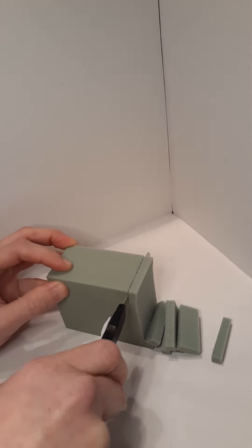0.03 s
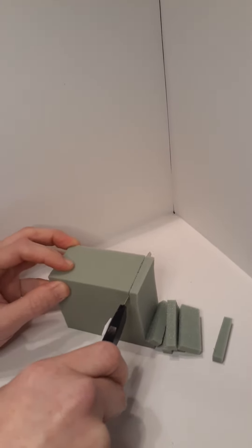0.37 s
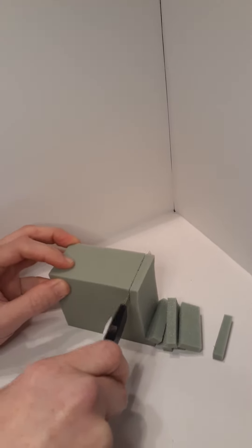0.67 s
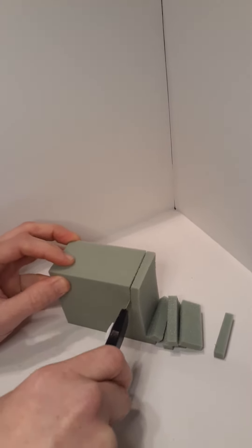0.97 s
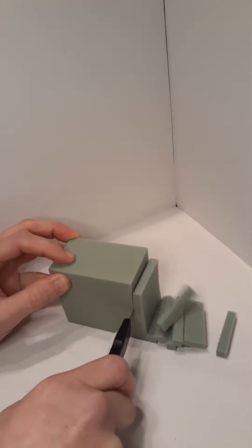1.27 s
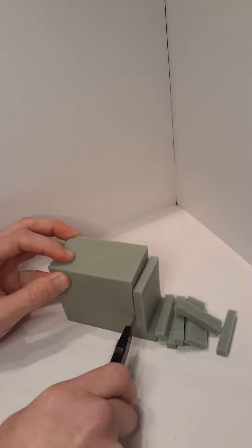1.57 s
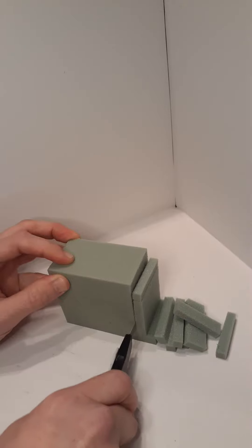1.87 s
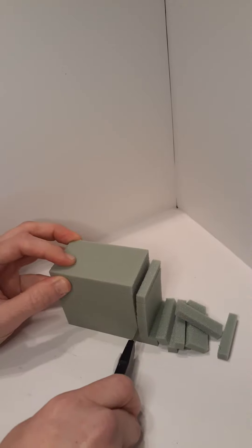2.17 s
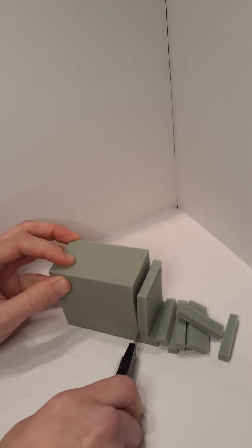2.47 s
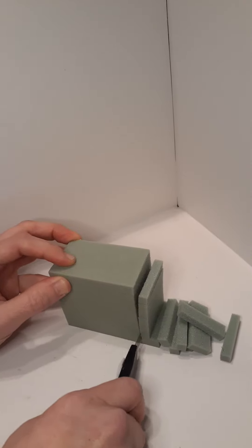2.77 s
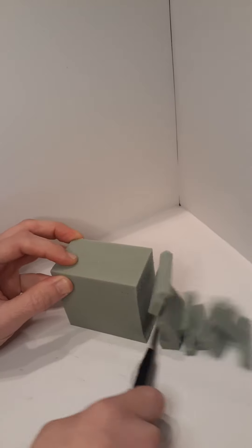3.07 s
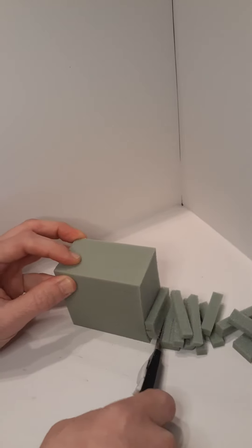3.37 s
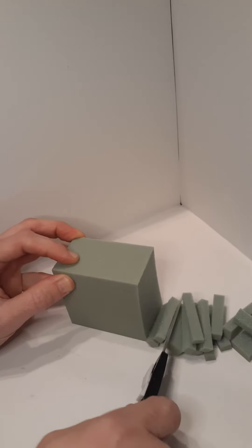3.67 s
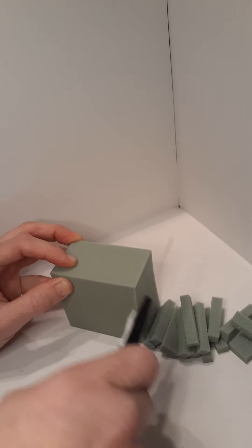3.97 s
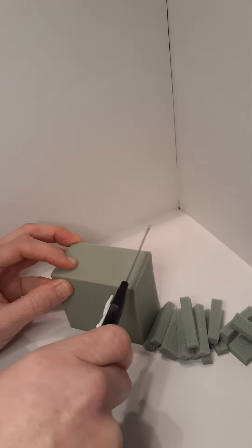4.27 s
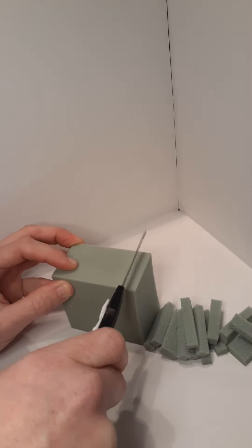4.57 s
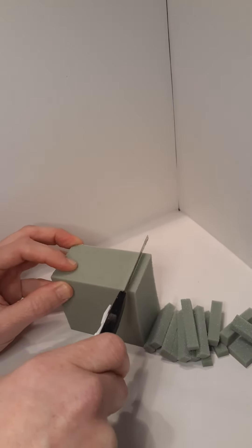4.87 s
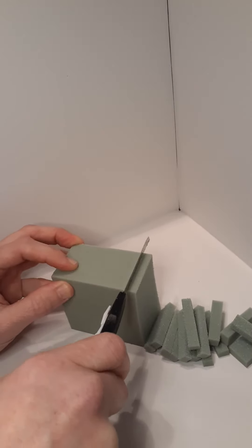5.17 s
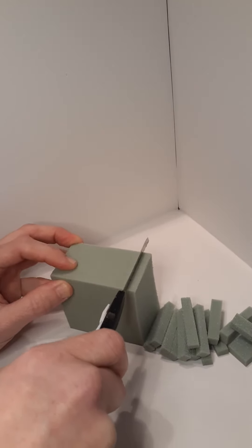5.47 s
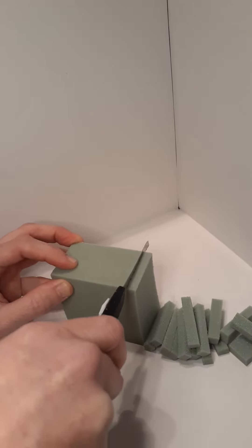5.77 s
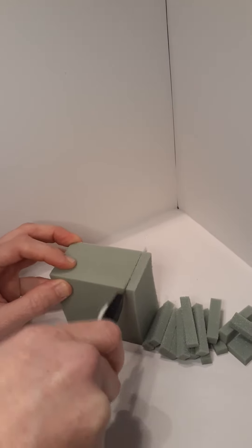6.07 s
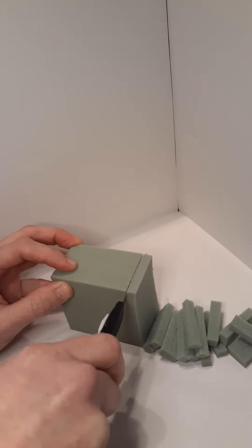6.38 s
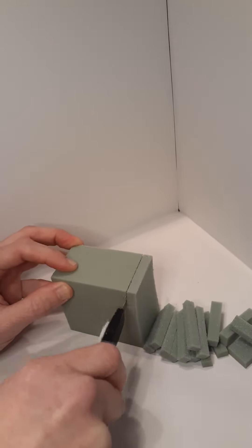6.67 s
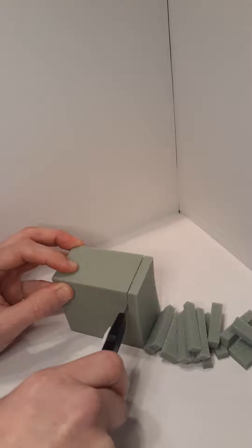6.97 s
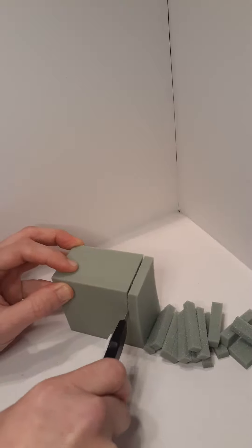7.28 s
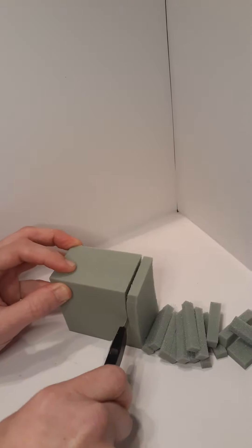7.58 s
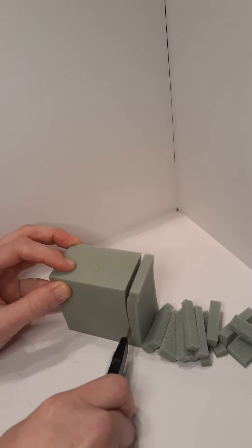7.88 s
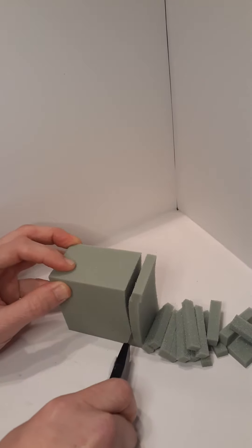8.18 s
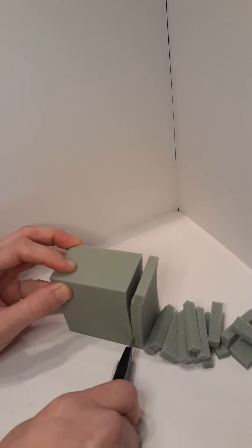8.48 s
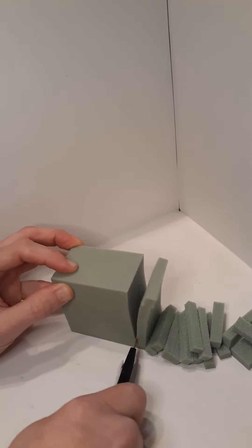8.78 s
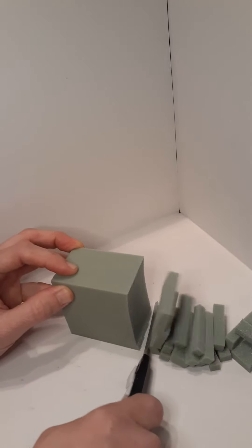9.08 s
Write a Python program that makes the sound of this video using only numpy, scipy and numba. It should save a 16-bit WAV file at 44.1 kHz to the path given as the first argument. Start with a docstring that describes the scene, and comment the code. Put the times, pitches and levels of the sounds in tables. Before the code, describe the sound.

Close, brittle crunching and crackling of a blade cutting two slices of dry floral foam, which fall with light, dry ticks.

```python
"""A table in the corner of a small bare room, a phone's two microphones close to a block of dry floral foam.
A knife is pushed down through the block twice. Brittle cells pop in slips: separate crackles when the
blade creeps, a dense crunch with a dull knock when it lunges. The crunch rings the block and the slice;
each slice finally snaps off and topples on to the pile of earlier ones. Hands rumble softly on the
table, over low room air and a faint mains hum."""
import sys
import numpy as np
from scipy import signal
from scipy.fft import rfft, irfft, next_fast_len
from scipy.io import wavfile
from scipy.ndimage import uniform_filter1d
from numba import njit

SR = 44100
rng = np.random.default_rng(int(sys.argv[2]) if len(sys.argv) > 2 else 0)


def write(x):
    x = np.atleast_2d(x).T
    wavfile.write(sys.argv[1], SR, np.round(np.clip(x, -1, 1) * 32767).astype(np.int16))


N = 407484
T = np.arange(N) / SR
CLOCK = T[::20]  # the hand moves slowly, so its motion needs few time steps

# the blade strains the foam, then lunges through it:
# (start [s], length [s], straining beforehand [s], level [dB], knock [dB])
LUNGES = [(0, 0.034, 0.011, -16, -18.5), (.403, .018, .05, -19, -45), (0.669, 0.052, .11, -16, -29.5),
          (0.969, .105, .122, -16.5, -18.5), (1.291, 0.016, 0.044, -23, -51),
          (1.405, .077, .004, -16.5, -30.5), (1.83, .056, .045, -18, -27.5),
          (2.032, 0.018, 0.067, -19.5, -50.5), (2.135, .012, .005, -14.5, -20.5),
          (5.227, .024, .005, -19, -47), (5.342, 0.028, .01, -20, -45), (6.03, 0.077, .005, -15.5, -38.5),
          (6.656, .043, 0.051, -17.5, -21), (7.148, 0.063, .018, -17, -19), (7.412, 0.053, .027, -16, -27),
          (7.64, .068, 0.054, -15.5, -28), (7.818, .06, .035, -17, -29.5), (7.978, 0.054, .096, -18, -28.5)]
GIVE_SHARE = .58  # the foam gives way this far through each lunge
# a slice lands flat and bounces: (time [s], tick [dB], hollow body [dB], knock [dB])
LANDINGS = [(2.9665, -16, -32, -38.5), (3.0207, -13.5, -24, -29), (3.0402, -12, -29, -24),
            (3.1697, -38, -47.5, -54), (8.7898, -15, -42.5, -31.5), (8.877, -7, -36.5, -27),
            (8.894, -10.5, -32.5, -20.5)]


def undb(db):
    """Decibels to gain."""
    return 10 ** (np.asarray(db) / 20)


def unit(x):
    """Scale to rms 1."""
    return x / np.sqrt(np.mean(x ** 2) + 1e-18)


def contour(points, size):
    """A (frequency [Hz], level [dB]) outline on the bins of a transform."""
    hz, db = np.transpose(points)
    return np.interp(np.log(np.fft.rfftfreq(size, 1 / SR) + 1), np.log(hz), db)


def colour(x, points, size=4096):
    """Minimum-phase filter with the given outline; white noise keeps its power."""
    cepstrum = irfft(np.log(undb(contour(points, size))))
    cepstrum[1:size // 2] *= 2
    cepstrum[size // 2 + 1:] = 0
    impulse = unit(irfft(np.exp(rfft(cepstrum)))) / np.sqrt(size)
    return signal.oaconvolve(x, impulse[None])[:, :N]


@njit
def bandpass(x, hz, width_hz):
    """State-variable band-pass with a moving centre."""
    out, band, low = np.empty(len(x)), 0., 0.
    for i in range(len(x)):
        step, damping = np.tan(np.pi * hz[i] / SR), width_hz / hz[i]
        swing = (band + step * (x[i] + 1e-18 - low)) / (1 + step * (step + damping))
        band, low = 2 * swing - band, low + 2 * step * swing
        out[i] = damping * swing
    return out


def ring(x, hz, width_hz):
    """A steep-sided resonance; white noise keeps its power."""
    hz, width_hz = hz * np.ones(N), float(width_hz)
    rung = np.array([bandpass(bandpass(side, hz, width_hz), hz, width_hz) for side in x])
    return rung * np.sqrt(2 * SR / np.pi / width_hz)


def pair(three, likeness):
    """Left and right microphone from one shared signal and one of their own each."""
    return np.sqrt(likeness) * three[0] + np.sqrt(1 - likeness) * three[1:]


def noise(likeness):
    """White noise at both microphones."""
    return pair(rng.standard_normal((3, N)), likeness)


def room_tone(air_db=-64.5, waver_db=-2.5, hum_hz=120, hum_db=-73):
    """Low room air that wavers slowly, and a faint mains hum."""
    # spectrum of the room air: (frequency [Hz], level [dB])
    air_colour = [(30, -10.5), (55, -2.5), (100, -7.5), (125, 0), (160, -10), (350, -7), (440, -9),
                  (650, -20), (1000, -31), (2500, -43.5), (7000, -50), (14000, -48)]
    waver = np.interp(T, np.linspace(0, T[-1], num=60), rng.standard_normal(size=60))
    air = unit(colour(noise(0.62), air_colour)) * undb(air_db + waver_db * waver)
    return air + undb(hum_db) * np.sin(2 * np.pi * hum_hz * T)


def stroke(start, end, rise_db=0, attack_s=.005, release_s=.006):
    """Envelope of one movement: attack, a hold that may grow or sag, release."""
    along = np.clip((CLOCK - start) / max(end - start, 1e-3), 0, 1)
    attack = np.clip((CLOCK - start) / attack_s, 0, 1)
    release = np.exp(-np.maximum(CLOCK - end, 0) / release_s)
    return attack * release * undb(rise_db * (along - .5))


def hand(light_slips_hz=62.3, firm_slips_hz=53.86, firm_db=-23, lunge_slips_hz=998.5,
         strain_db=-4, strain_db_per_s=-135, peak_db=1, arch_db=1.3,
         withdraw_db=-57.5, withdraw_slips_hz=1097):
    """How hard the foam is pushed or rubbed, and its slips a second, which quicken with the push."""
    # slow crackle of the creeping blade, or faint rustle of a fallen slice rubbing on the pile:
    # (start [s], end [s], level [dB])
    crackles = [(0.034, 0.072, -29), (0.095, 0.148, -34), (0.229, 0.361, -50), (.724, 0.751, -27),
                (1.108, 1.18, -35), (1.317, 1.357, -38.5), (1.482, 1.511, -23), (1.571, 1.636, -29),
                (2.068, 2.12, -21), (2.264, 2.504, -22), (2.511, 2.627, -42), (2.636, 2.76, -51.5),
                (2.838, 2.906, -47.5), (3.147, 3.223, -43), (4.773, 4.891, -54), (4.894, 4.933, -38.5),
                (4.931, 5.012, -29), (5.061, 5.152, -30), (5.15, 5.227, -38.5), (5.26, 5.317, -31),
                (5.381, 5.441, -31), (5.446, 5.702, -23.5), (5.7, 5.927, -29), (5.931, 6.014, -32),
                (6.173, 6.268, -29), (6.323, 6.418, -32.5), (6.435, 6.542, -29.5), (6.785, 6.884, -32),
                (6.913, 6.974, -32), (6.974, 7.03, -23.5), (7.29, 7.343, -32), (8.139, 8.352, -23.5),
                (8.523, 8.742, -57), (9.059, 9.118, -50), (9.18, 9.241, -57)]
    slow, lunge, lunging = 0, 0, 0
    for start, end, db in crackles:
        slow = np.hypot(slow, undb(db) * stroke(start, end, rise_db=-1.5))
    for start, length, strain_s, db, _ in LUNGES:
        # straining grows towards its lunge, and is quieter the longer it takes
        strain = stroke(start - strain_s, start, rise_db=4)
        slow = np.hypot(slow, undb(db + strain_db + strain_db_per_s * strain_s) * strain)
        # a lunge peaks where the foam gives and falls off towards both ends
        move = stroke(start, start + length, attack_s=.002, release_s=.007)
        from_give = np.clip(2 * ((CLOCK - start) / length - GIVE_SHARE), -1, 1)
        lunge += undb(db + peak_db - arch_db * from_give ** 2) * move
        lunging += move
    # between the cuts the flat of the blade is drawn back along the cut face
    withdraw = stroke(start=3.36, end=3.76, rise_db=-6, attack_s=.14, release_s=.007)
    push = np.hypot(slow, lunge) + undb(withdraw_db) * withdraw
    slow_rate = light_slips_hz + firm_slips_hz * slow / undb(firm_db)
    rate = slow_rate + lunge_slips_hz * lunging + withdraw_slips_hz * withdraw
    return np.interp(T, CLOCK, push), np.interp(T, CLOCK, rate)


def avalanche(power, decay_ms, rise_ms=0.61):
    """Each slip sets off a run of breaking cells that dies away; returns their power."""
    ms = T[:SR // 50] * 1000
    shape = np.exp(-ms / decay_ms) * (1 - np.exp(-ms / rise_ms))
    return np.maximum(signal.oaconvolve(power, shape / shape.sum())[:N], 0)


def bursts(times, db, decay_ms):
    """Envelope of single avalanches, each with the energy of 3 ms at its level."""
    power = np.zeros(N)
    np.add.at(power, (times * SR).astype(int), undb(db) ** 2 * .003 * SR)
    return np.sqrt(avalanche(power, decay_ms))


def stick_slip(drag=0.11, jitter=.5, scatter_db=3, merge_hz=130, judder_db=2, rub=0.31, rub_db=-37.5):
    """Envelope of the crunch: the blade, or a fallen slice, sticks and slips over a steady drag."""
    push, rate = hand()
    # a slip comes each time the foam has been strained by about one step
    step_chance, size_chance = rng.standard_normal((N // 20, 2)).T
    steps = np.exp(jitter * step_chance - jitter ** 2 / 2)
    at = np.searchsorted(np.cumsum(rate) / SR, np.cumsum(steps))
    at = at[at < N]
    work = undb(scatter_db * np.clip(size_chance[:len(at)], -2, 2)) ** 2
    slips = avalanche(np.bincount(at, work / work.mean() * SR / rate[at], N), decay_ms=1.5)
    # the hand feeds evenly, so slips share out the work of each few hundredths of a second
    slips /= uniform_filter1d(slips, size=1500) + 1e-6
    # in a lunge the slips run together, and the whole blade judders instead
    shake = unit(uniform_filter1d(rng.standard_normal(N), size=260))
    judder = unit(undb(judder_db * shake * rate / (rate + merge_hz)))
    # a push lighter than rub_db adds smooth rubbing
    steady = drag + rub / (1 + (push / undb(rub_db)) ** 2)
    return push * judder * np.sqrt((slips + steady) / (1 + steady))


def pops(per_s, likeness):
    """Cell walls breaking: a dense spray of tiny clicks."""
    clicks = rng.standard_normal((3, N)) * (rng.random((3, N)) < per_s / SR)
    return unit(pair(clicks, likeness))


def patchy(x, depth_db=3.5, hump_hz=700, size=512):
    """Every patch of torn cells has its own colour: random spectral humps, new every few ms."""
    hz, _, frames = signal.stft(x, SR, nperseg=size)
    hump = np.exp(-(2 * (hz[:31] - hz[15]) / hump_hz) ** 2)
    humps = signal.oaconvolve(rng.standard_normal(frames.shape[1:]), hump[:, None], "same", axes=0)
    gain = unit(undb(depth_db * unit(humps)))
    return signal.istft(frames * gain, SR, nperseg=size)[1][:, :N]


def giving_way(crack_db=5):
    """The foam gives within each lunge: rows of (time [s], crack [dB], knock [dB])."""
    return np.array([(start + GIVE_SHARE * length, db + crack_db, knock_db)
                     for start, length, _, db, knock_db in LUNGES])


def cutting(level_db=-2, crack_db=-1, bite_db=-2.5, overtone=2.05, rasp_db=2):
    """Popping cells, heard directly and through the resonances of block and slice."""
    # single big slips of a creeping blade: (time [s], level [dB])
    cracks = [(.368, -34), (1.067, -17), (1.4149, -19), (2.0806, -17), (2.3131, -23), (2.4443, -12),
              (2.4757, -14), (2.5034, -18), (4.9505, -20), (5.0691, -19), (5.1375, -13), (5.2353, -27),
              (5.446, -18), (5.5294, -15.5), (5.5501, -16.5), (5.7534, -16.5), (5.8294, -12.5),
              (5.8534, -13), (7.6069, -18), (7.9204, -18.5), (8.1814, -18), (8.201, -11), (8.2943, -12.5)]
    # spectrum of the popping cells: (frequency [Hz], level [dB])
    cell_colour = [(100, -16.5), (330, -11), (650, -13.5), (1500, -17), (2500, -9.5), (3100, -7),
                   (4400, -2.5), (6300, -5), (7200, -0.5), (9500, -2.5), (11000, -1.5), (12500, 4),
                   (14500, 11), (16000, -7.5)]
    # resonances of the block: (frequency [Hz], width [Hz], level [dB])
    block_modes = [(970, 283, -1.5), (1497, 270, -8.5), (2690, 500, -8), (4630, 540, -8), (5130, 300, -5.5)]
    # as the blade goes down, the slice rings higher and the block less:
    # (time [s], slice pitch [Hz], block ring [dB], slice ring [dB])
    descent = [(0, 1240, -18, -13), (.42, 1143, -14.5, -18.5), (0.701, 1210, -18, -17),
               (1.03, 1530, -29, -15.5), (1.45, 2004, -25, -16), (1.87, 2250, -26.5, -17.5),
               (2.5, 2326, -31, -20.5), (3.4, 2347, -29, -81), (4.8, 1405, -23, -25.5),
               (5.35, 1400, -17, -20.5), (5.6, 1400, -9, -14), (6.1, 1431, -10.5, -16.5),
               (6.7, 1496, -19.5, -11.5), (7.179, 1657, -19.5, -14.5), (7.679, 1944, -27, -16.5),
               (8.299, 2365, -27, -16.5), (8.599, 2363, -33, -37.5)]
    depth_times, *columns = np.transpose(descent)
    slice_hz, block_db, slice_db = [np.interp(T, depth_times, column) for column in columns]
    bites = [(start, db + bite_db) for start, _, _, db, _ in LUNGES]  # each lunge opens with a crack
    times, db = np.vstack([cracks, bites, giving_way()[:, :2]]).T
    crunch = np.hypot(stick_slip(), bursts(times, db, decay_ms=1.0) * undb(crack_db))
    cells = colour(patchy(pops(per_s=16000, likeness=0.039)) * crunch, cell_colour)
    shove = noise(0.81) * crunch * undb(block_db)
    block = sum(undb(mode_db) * ring(shove, hz, width) for hz, width, mode_db in block_modes)
    flex = noise(0.46) * crunch * undb(slice_db)
    slice_ring = ring(flex, slice_hz, width_hz=1150)
    # as the slice comes free, its second resonance adds a rasp
    freed = (slice_hz - slice_hz.min()) / np.ptp(slice_hz)
    rasp = undb(rasp_db) * ring(flex * freed ** 2, overtone * slice_hz, width_hz=1900)
    return undb(level_db) * (cells + block + slice_ring + rasp)


def knocking(level_db=-1, contact_ms=3.26, sway_hz=75, left_db=-6):
    """The light foam jolts and shoves the air: a short pulse, a slow swing back and two brief rings."""
    times, db = np.transpose([(row[0], row[-1]) for row in [*giving_way(), *LANDINGS]])
    jolts = np.zeros(N)
    jolts[(times * SR).astype(int)] = undb(db)
    contact = np.sin(np.pi * np.minimum(T[:SR // 50] * 1000 / contact_ms, 1)) ** 2
    pulse = signal.oaconvolve(jolts, contact)[:N]
    pulse = signal.sosfilt(signal.butter(1, sway_hz, "high", fs=SR, output="sos"), pulse)
    lower = undb(-22) * ring([pulse], hz=400, width_hz=140)
    upper = undb(-13) * ring([pulse], hz=533, width_hz=40)
    return undb(level_db) * undb([[left_db], [0]]) * (pulse + lower + upper)


def handling(level_db=-1):
    """Soft swells of low rumble as the hands press on block and table."""
    # hands shifting their grip: (time [s], length [s], level [dB])
    grips = [(2.38, .28, -57), (4.0, 0.052, -63.5), (4.1, 0.12, -60), (5.206, 0.11, -53.5),
             (5.587, 0.18, -52), (8.32, 0.18, -55.5)]
    # spectrum of hands on the table: (frequency [Hz], level [dB])
    rumble_colour = [(30, -21), (55, 4.5), (85, 5), (200, -6), (380, -9.5), (650, -33), (5000, -76)]
    force = sum(undb(db) * np.exp(-(2 * (T - time) / length) ** 2) for time, length, db in grips)
    return undb(level_db) * force * unit(colour(noise(0.83), rumble_colour))


def snapping(tick_db=-1, hollow_db=1, snap_body_db=-27.5):
    """Dry ticks of the breaking and falling slice, with a hollow knock when it lands flat."""
    # a slice snaps off and grazes the pile: (time [s], level [dB])
    snaps = [(2.5724, -28.5), (2.9118, -15.5), (2.939, -21.5), (2.9503, -28), (3.0287, -14), (8.717, -37),
             (8.746, -16.5), (8.7627, -11), (8.7722, -23.5), (8.8553, -19.5), (8.872, -10.5),
             (9.0562, -35.5)]
    # spectra of the dry tick and the hollow knock: (frequency [Hz], level [dB])
    tick_colour = [(100, -46), (700, -17), (1500, -29), (2600, -8), (5000, -1.5), (8000, 1.5), (11000, 0.5),
                   (14500, 14), (16000, 7.5)]
    hollow_colour = [(60, -6), (140, -3.5), (400, -8.5), (800, -8.5), (1500, -6.5), (2600, -4),
                     (6000, -19.5)]
    hits = [(time, db, db + snap_body_db) for time, db in snaps] + [row[:3] for row in LANDINGS]
    times, db, body_db = np.transpose(hits)
    tick = colour(pops(per_s=12000, likeness=0.12) * bursts(times, db, decay_ms=0.99), tick_colour)
    hollow = colour(noise(0.93) * bursts(times, body_db, decay_ms=0.75), hollow_colour)
    return undb(tick_db) * tick + undb(hollow_db) * hollow


def table_thump(level_db=-9, hz=92, decay_s=0.0079, left_db=-4):
    """A landing slice sets the table top swinging for a few cycles."""
    out, t = np.zeros(N), T[:SR // 10]
    swing = np.sin(2 * np.pi * hz * t) * np.exp(-t / decay_s)
    for time, _, _, knock_db in LANDINGS:
        at = int(time * SR)
        out[at:at + len(t)] += undb(knock_db) * swing
    return undb(level_db) * undb([[left_db], [0]]) * out


def corner(x):
    """The direct sound with its first echoes from the nearby surfaces."""
    # echoes off table and corner wall: (left delay [ms], right delay [ms], level [dB])
    echoes = [(.55, 0.23, -21), (1.1, 1.45, -22.5)]
    out = x.copy()
    for left_ms, right_ms, db in echoes:
        for side, ms in enumerate((left_ms, right_ms)):
            out[side] += undb(db) * np.roll(x[side], int(ms * SR / 1000))
    return out


def room_tail(x, t60_s=0.32, treble_t60_s=0.27, split_hz=9000, build_s=0.0018):
    """Diffuse tail of a small bare room; the top dies a little sooner."""
    # colour of the reverberation: (frequency [Hz], level [dB])
    tail_colour = [(60, -16.5), (300, 8), (1000, 3.5), (4000, 2.5), (9000, 2), (16000, 2)]
    t = T[:SR * 3 // 4]
    hiss = rng.standard_normal((2, len(t)))
    low = signal.sosfiltfilt(signal.butter(2, split_hz, fs=SR, output="sos"), hiss)
    tail = low * 1000 ** (-t / t60_s) + (hiss - low) * 1000 ** (-t / treble_t60_s)
    build = 1 - np.exp(-(t / build_s) ** 2)
    impulse = unit(tail * build) / np.sqrt(len(t))
    return colour(signal.oaconvolve(x, impulse, axes=1)[:, :N], tail_colour)


def scene(cut_room_db=-12, slice_room_db=-7):
    """Close at the table: the block shields the cut; the free slice radiates more into the room."""
    cut = cutting() + knocking() + handling()
    falling = snapping() + table_thump()
    into_room = undb(cut_room_db) * cut + undb(slice_room_db) * falling
    return corner(cut + falling) + room_tail(into_room) + room_tone()


def record(dry, low_cut_hz=42, top_hz=16000, ceiling=3.1):
    """The phone's two microphones differ in colour; deep bass and top are cut, peaks rounded."""
    # balance of the two microphone ports: (frequency [Hz], left minus right [dB])
    ports = [(60, 10), (150, -2.5), (600, 0), (1200, -3), (2800, -4.5), (4400, -3.5), (6000, -0.5),
             (7400, -5.5), (8600, 5), (10000, 5.5), (11500, -5), (13800, -10), (16000, -13.5)]
    size = next_fast_len(N + SR // 10)
    lean = undb(contour(ports, size)) ** 2
    gains = np.sqrt(2 * np.array([lean, np.ones_like(lean)]) / (1 + lean))
    heard = irfft(rfft(dry, size) * gains, size)[:, :N]
    heard = signal.sosfilt(signal.butter(3, low_cut_hz, "high", fs=SR, output="sos"), heard)
    heard = ceiling * np.tanh(heard / ceiling)
    return signal.sosfilt(signal.ellip(10, .2, 70, top_hz, fs=SR, output="sos"), heard)


dry = scene()
out = record(dry)
write(out)
```